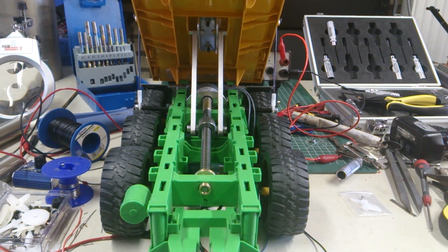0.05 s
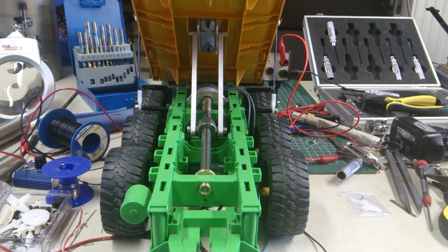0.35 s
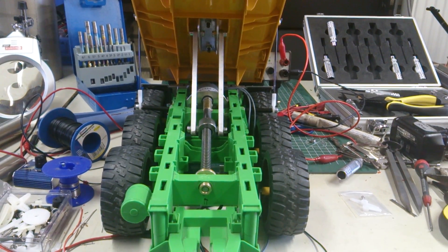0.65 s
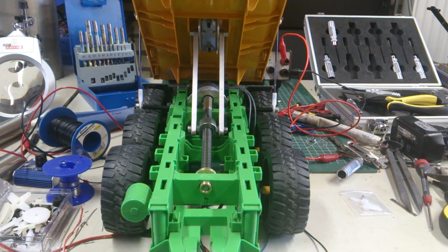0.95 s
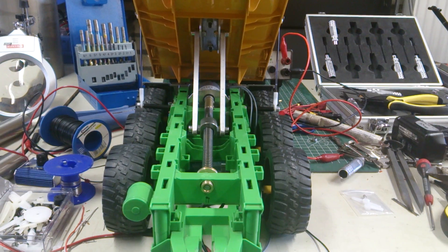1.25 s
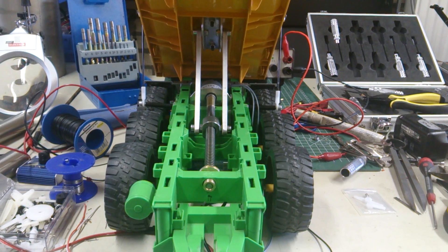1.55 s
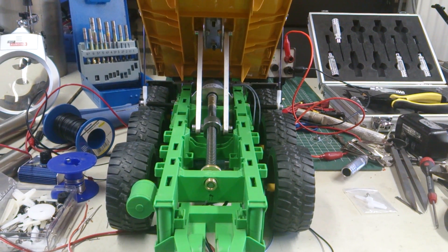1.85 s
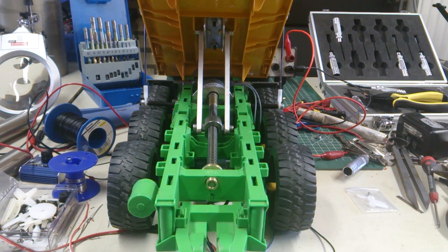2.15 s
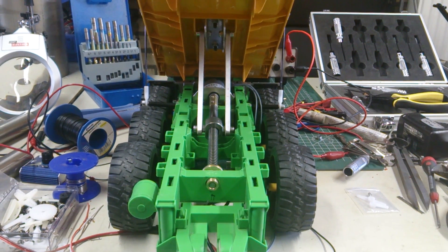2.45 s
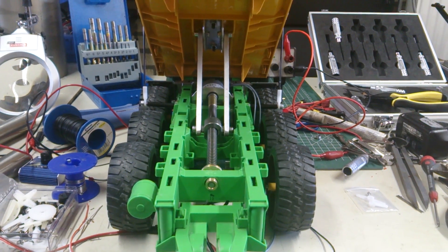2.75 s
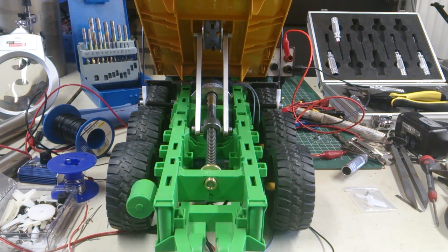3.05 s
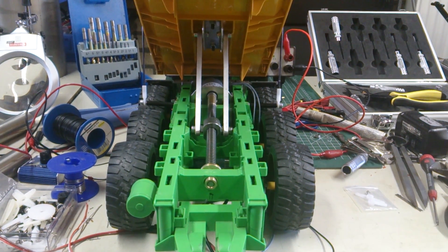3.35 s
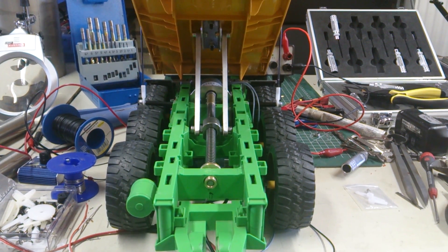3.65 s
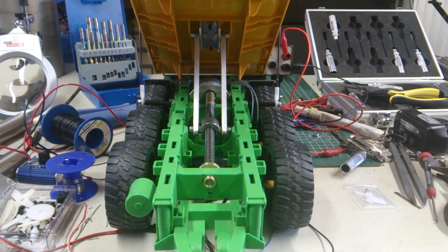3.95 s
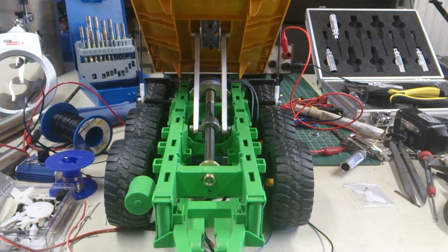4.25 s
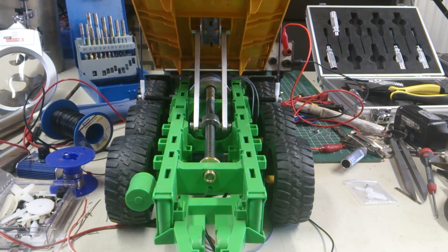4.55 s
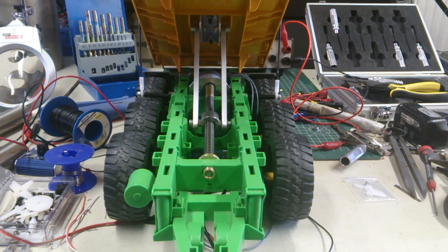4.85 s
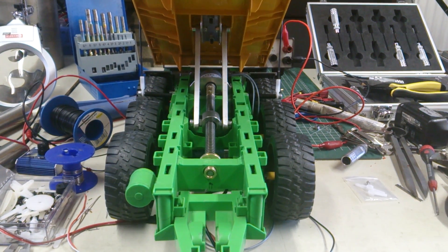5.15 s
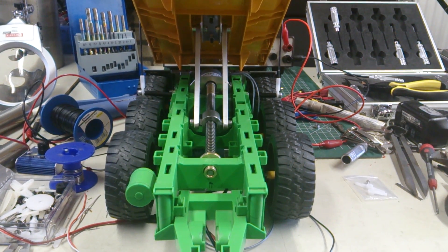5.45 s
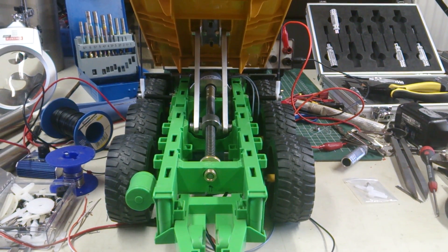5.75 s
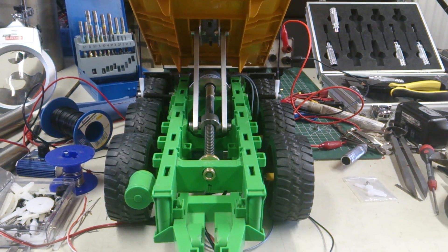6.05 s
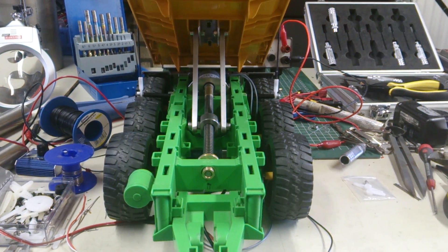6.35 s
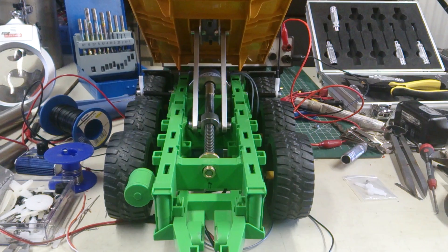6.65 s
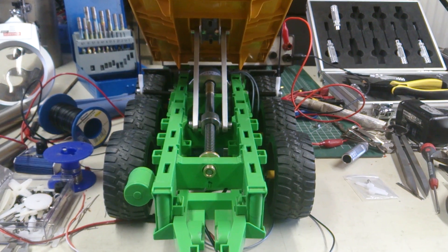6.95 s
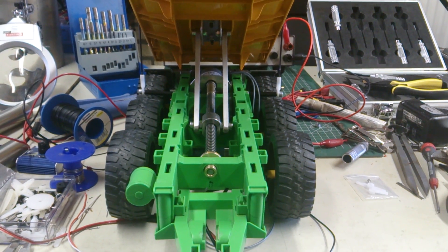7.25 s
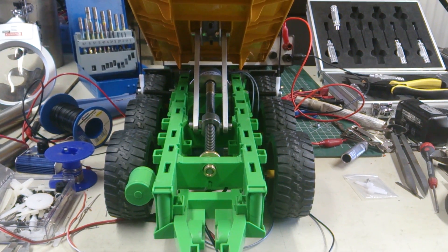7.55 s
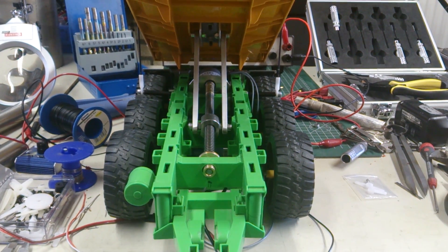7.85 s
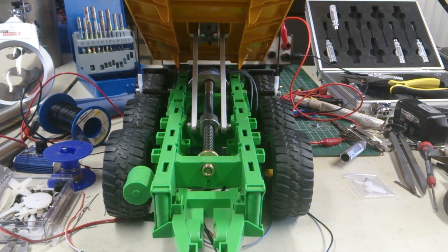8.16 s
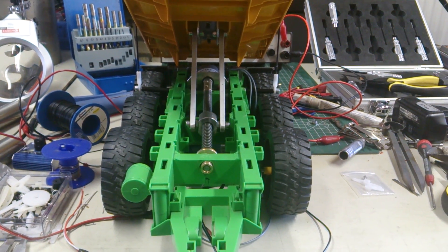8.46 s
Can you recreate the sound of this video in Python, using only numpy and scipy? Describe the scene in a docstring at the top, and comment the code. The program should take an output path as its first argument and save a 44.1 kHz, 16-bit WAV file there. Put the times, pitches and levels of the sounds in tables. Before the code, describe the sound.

A small electric motor whines steadily, with a dry rasp on each turn of the screw lowering a toy truck's tipper.

```python
"""First comes the whine of a small electric motor, geared down to a screw that lowers a toy tipper body.
Its rotor and small gear sing over the hiss of sliding brushes and teeth. The screw binds once a turn:
the motor sags and recovers, and the thread rasps in the plastic chassis. A draught puffs softly on the
close stereo microphone in the quiet room, and midway the toy settles on the workbench with dull bumps."""
import sys
import numpy as np
from scipy import signal
from scipy.fft import rfft, irfft, next_fast_len
from scipy.io import wavfile
from scipy.ndimage import uniform_filter1d

SR = 44100
rng = np.random.default_rng(int(sys.argv[2]) if len(sys.argv) > 2 else 0)


def inscribe(sig):
    """Save sig as 16-bit PCM at rate SR to the path in sys.argv[1].

    A 1-D sig is mono; a 2-D sig holds one channel per row.
    Samples are clipped to [-1, 1] before scaling.
    """
    pcm = np.round(np.clip(np.atleast_2d(sig).T, -1, 1) * 32767)
    wavfile.write(sys.argv[1], SR, pcm.astype(np.int16))


N = 380141
FFT_SIZE = next_fast_len(N, real=True)
TIME, HZ = np.arange(N) / SR, np.fft.rfftfreq(FFT_SIZE, 1 / SR)


def amp(db):
    """Turn decibels into a gain."""
    return 10 ** (np.asarray(db) / 20)


def unit_rms(x):
    """Scale a signal to an average strength (rms) of 1."""
    return x / np.sqrt(np.mean(abs(x) ** 2) + 1e-20)


def over_time(rows):
    """Join a table's points in time: one curve for each column after the first."""
    times, *columns = np.transpose(rows)
    return np.array([np.interp(TIME, times, c) for c in columns])


def over_pitch(rows, hz):
    """Look up a table's columns at the given frequencies."""
    freqs, *columns = np.transpose(rows)
    return np.array([np.interp(np.log(hz + 1), np.log(freqs + 1), c) for c in columns])


def drift(rate_hz, order=2):
    """A random wobble of strength 1, mostly slower than the given rate."""
    times = np.linspace(0, TIME[-1], 8192)
    hz = np.fft.rfftfreq(len(times), times[1])
    slow = irfft(rfft(rng.standard_normal(len(times))) / np.sqrt(1 + (hz / rate_hz) ** (2 * order)))
    return np.interp(TIME, times, unit_rms(slow))


def waver(depth_db, rate_hz):
    """A slow random change of level in dB, different left and right."""
    return depth_db * np.array([drift(rate_hz), drift(rate_hz)])


def tone(cycles, level_db, lead, flutter, flutter_hz):
    """A tone that flutters, as a shaft does in loose bearings; left is ahead by `lead` radians."""
    wobble = 1 + flutter * (drift(flutter_hz) + 1j * drift(flutter_hz))
    wave = unit_rms(np.exp(2j * np.pi * cycles) * wobble)
    return np.sqrt(2) * amp(level_db) * np.array([wave, wave * np.exp(-1j * lead)]).real


# How alike the two sides of the microphone sound: f/Hz, likeness/0-1
LIKENESS = [(30, 0.38), (120, 0.098), (400, 0.99), (800, 0.94), (1800, 0.51), (2600, 0.37), (5000, 0.35),
            (6400, 0.12), (7500, 0.21), (15000, .15)]
# How far the left side is ahead of the right: f/Hz, lead/rad
LEFT_LEAD = [(30, 0), (500, .6), (800, 1.2), (1000, 1.8), (1800, 2.7), (2400, 3.7), (3800, 4.2),
             (4200, 7.2), (5000, 7.8), (5400, 10.3), (6400, 14)]
def noise(gain, pressure=1):
    """Stereo noise that follows a rubbing pressure, coloured by a gain at each frequency."""
    left, other = rfft(rng.standard_normal((2, N)) * pressure, FFT_SIZE)
    same = np.clip(over_pitch(LIKENESS, HZ)[0], 0, 1)
    right = (same * left + np.sqrt(1 - same ** 2) * other) * np.exp(-1j * over_pitch(LEFT_LEAD, HZ)[0])
    return irfft(np.array([left, right]) * gain, FFT_SIZE)[:, :N] * np.sqrt(SR / 2)


def bench_echoes(hz, depth_db, grain_hz=110):
    """Echoes off the cluttered bench boost some pitches and weaken others, differently on each side."""
    grid = np.linspace(0, SR / 2, 4096)
    smoothing = np.exp(-(np.fft.rfftfreq(len(grid), grid[1]) * grain_hz) ** 2)
    ripples = irfft(rfft(rng.standard_normal((2, len(grid)))) * smoothing)
    return np.array([np.interp(hz, grid, unit_rms(amp(depth_db * unit_rms(side)))) for side in ripples])


def resonance(hz, width, left_db, right_db):
    """The left and right gain of a part that rings around one pitch."""
    return amp([[left_db], [right_db]]) / (1 + ((HZ - hz) / (0.79 * width)) ** 2)


# Each time the screw binds: t/s, friction rise/dB, slowed motor/(turns/s), recovered motor/(turns/s)
BINDS = [(0.021, 7.5, 128.05, 130.51), (0.687, 8.5, 128.22, 130.46), (1.356, 9, 128.27, 130.4),
         (2.027, 9.5, 128.28, 130.16), (2.708, 10.5, 128.3, 130.1), (3.367, 10.5, 128.17, 130.15),
         (4.026, 10, 128.08, 130.37), (4.711, 9.5, 128.17, 130.37), (5.388, 9.5, 128.39, 130.68),
         (6.044, 9.5, 128.43, 130.79), (6.722, 9.5, 128.39, 130.77), (7.38, 8.5, 128.54, 130.74),
         (8.053, 8, 128.27, 130.5), (8.72, 7, 128.3, 130.5)]
def motor_speed(slowest_s=.026, pick_up_s=.164, recovered_s=.503):
    """Motor turns a second: each bind drags the motor down, then it picks up steadily."""
    start, _, slowed, recovered = np.transpose(BINDS)
    times = np.c_[start + slowest_s, start + pick_up_s, start + recovered_s].ravel()
    speed = np.interp(TIME, times, np.c_[slowed, slowed, recovered].ravel())
    return uniform_filter1d(speed, size=4000, mode="nearest")  # the rotor's weight smooths each change


def nut_friction(free_db=-4.5, grip_s=0.12, release_s=0.21):
    """Friction of the nut on the screw, in dB: it builds up to each bind and lets go again."""
    rises = (db * np.exp(-abs((TIME - t) / np.where(TIME < t, grip_s, release_s)) ** 1.58)
             for t, db, _, _ in BINDS)
    return free_db + sum(rises)


# Hum of the rotor: t/s, left level/dB
POLE_HUM = [(0, -64), (1.5, -64.5), (3, -64.5), (4.5, -64.5), (6, -62.5), (6.9, -62.5), (7.3, -59.5),
            (8, -61), (8.62, -62)]
def pole_hum(turns):
    """The rotor's three poles hum as they pass the magnets, a little softer on the right."""
    return tone(3 * turns, over_time(POLE_HUM) + [[1], [-.7]] , 0.59, flutter=0.054, flutter_hz=8.4)


# Tone of the magnets tugging on the rotor: t/s, base level/dB
MAGNET_TUG = [(0, -47), (.6, -45), (.73, -49.5), (1.05, -44), (1.16, -49.5), (1.3, -45), (2.3, -46.5),
              (2.88, -46.5), (3.33, -44), (3.66, -49), (3.9, -47.5), (6.2, -48), (6.55, -51), (6.73, -45),
              (7.03, -52.5), (7.26, -46.5), (7.43, -51.5), (8.62, -50)]
def rotor_whine(turns, rattle_db=-9):
    """The magnets tug six times a turn; the motor rattles in its loose mount and roughens that tone."""
    level_db = over_time(MAGNET_TUG) + [[-0.45], [1.34]]  # left, right
    whine = tone(6 * turns, level_db + waver(.8, rate_hz=9), 1.1, flutter=0.27, flutter_hz=12.7)
    chatter = unit_rms(drift(55, order=1) + 1j * drift(55, order=1))
    rough = unit_rms(uniform_filter1d(chatter, size=130)) * np.exp(2j * np.pi * 6 * turns)
    rattle = np.sqrt(2) * amp(level_db + rattle_db) * np.array([rough, rough * np.exp(-1.1j)]).real
    return whine + rattle


def swells(rows, turn_s=.67, first_bind_s=.02):
    """The dB by which a gear tone swells as the screw turns; the pattern shifts as the nut travels."""
    turn, travel = (TIME - first_bind_s) / turn_s, TIME / TIME[-1]
    out = np.zeros((2, N))
    for per_turn, row in enumerate(rows, 1):
        out += [(top + (bottom - top) * travel) * np.cos(2 * np.pi * per_turn * (turn - place))
                for place, top, bottom in np.reshape(row, (2, -1))]
    return out


# The gear's tone, and the octave above it: t/s, left base level/dB, right base level/dB
GEAR_TONE = [(0, -57, -49.5), (2.6, -49.5, -52), (4.2, -52, -63.5), (5.6, -52, -54), (6.3, -52.5, -51.4),
             (7.3, -58, -46), (8.62, -57, -42.5)]
GEAR_OCTAVE = [(0, -50, -47), (4, -48.5, -49), (8.62, -52.5, -50.6)]
# The tone's paths to the microphone change as the body sinks: t/s, left lead/rad
GEAR_LEAD = [(0, 1.46), (2.8, 2.28), (4.5, 4.07), (5.9, 4.4), (8.62, 3.27)]
# Swells that come once, twice and three times a screw turn, one row each; a negative depth is a dip:
# place in the turn/0-1, depth at top of travel/dB, depth at bottom/dB (for left, then for right)
GEAR_SWELLS = [(0.73, 3.5, 7.5, 0.69, 5, 4), (0.13, -5.5, 4, 0.17, 1.1, -2.4),
               (0.18, 3, -2, 0.057, 0.63, -2)]
OCTAVE_SWELLS = [(0.88, -0.5, 2.5, 0.28, 3, 4.5), (0.12, -2, 3.5, 0.13, 0.2, 0.5),
                 (0.056, 0, 2.9, 0.18, -0.5, -0.2)]
def gear_whine(speed, turns):
    """The small gear's ten teeth mesh; echoes shift the left-right timing as the pitch moves."""
    extra_speed = speed - speed.mean()
    mesh_lead = over_time(GEAR_LEAD)[0] + extra_speed
    octave_lead = .1 - (1 + .1 * TIME) * extra_speed
    mesh_db = over_time(GEAR_TONE) + swells(GEAR_SWELLS) + waver(1.2, rate_hz=9.4) + 0.75
    octave_db = over_time(GEAR_OCTAVE) + swells(OCTAVE_SWELLS) + waver(1.3, rate_hz=4.9) - 0.4
    mesh = tone(10 * turns, mesh_db, mesh_lead, flutter=0.19, flutter_hz=28.7)
    octave = tone(20 * turns, octave_db, octave_lead, flutter=0.2, flutter_hz=20.4)
    return mesh + octave


# Weaker tones; whole multiples come from the motor, the others from the gears:
# multiple of the motor speed, left base level/dB, right base level/dB, growth/(dB/s)
OVERTONES = [(1, -80, -79, 0.6), (2, -84, -83, 1.2), (4.17, -70, -67, 0.1), (5, -80, -70, 0.4),
             (7, -63, -65, 0.4), (8, -60, -65, -0.8), (8.75, -65, -67, 0.1), (9, -59, -59, -0.0),
             (11, -65, -66, 0.9), (11.38, -64, -67, -0.6), (12, -60, -64, -0.7), (12.5, -63, -62, -0.4),
             (12.63, -60, -64, -0.3), (14, -62, -63, 0.9), (16, -61, -63, 0.3), (17, -60, -62, 0.4),
             (19, -59, -63, -0.1), (19.17, -64, -70, -0.4), (21, -59, -69, -0.4), (22, -63, -60, -0.2),
             (23, -55.5, -58.5, -0.3), (25, -58, -63, -0.9), (26, -65, -69, -0.4), (27, -56, -63, -0.7),
             (28, -66, -65, -1.5), (30, -59, -62, 0.4), (33, -58, -64, -0.7), (40, -58, -64, 0.6),
             (42, -63, -74, 0.2), (45, -59, -67, -0.9), (49.58, -64, -66, -0.8), (50, -60, -63, -0.5),
             (54, -65, -70, -1.7), (59, -63, -67, 0.1), (60, -60, -67, 0.4), (63, -59, -74, 0.5),
             (69, -60, -80, 1.2), (72, -57, -76, -0.9), (74, -62, -82, 1.6), (78, -64, -78, -0.4),
             (92, -65, -84, -1.5), (93, -66, -84, -1.5), (99, -67, -85, -0.9)]
def overtones(speed, turns, friction_db, trim_db=-0.7):
    """Many weak motor and gear tones waver as their pitches slide across the bench's echoes."""
    out = np.zeros((2, N))
    for multiple, left_db, right_db, growth in OVERTONES:
        hz = multiple * speed.mean()
        angle = 2 * np.pi * (multiple * turns + rng.random()) + .35 * drift(10)
        # the binding thread carries the tones near 6 kHz into the chassis
        load_db = 1.2 * friction_db * np.exp(-((hz - 6150) / 650) ** 4)
        echoes = bench_echoes(multiple * speed, depth_db=4.2, grain_hz=75)
        left, right = echoes * amp(2.5 * drift(8) + growth * TIME + load_db)
        out[0] += amp(left_db) * unit_rms(left) * np.cos(angle)
        out[1] += amp(right_db) * unit_rms(right) * np.cos(angle - over_pitch(LEFT_LEAD, hz)[0])
    return np.sqrt(2) * amp(trim_db) * out


# Pulses in the rubbing: multiple of the motor speed, relative depth/0-1
PULSES = [(5 / 12, .11), (1, .07), (3, .08), (4, .07), (5, .08), (6, .13), (9, .09), (10, .08)]
def contact_pressure(turns, depth=0.94, grit_db=1, grit_hz=250):
    """The rubbing pressure pulses with the brushes and teeth, and grit roughens it."""
    pulses = sum(share * np.cos(2 * np.pi * (k * turns + rng.random())) for k, share in PULSES)
    return unit_rms((1 + depth * pulses) * amp(grit_db * drift(grit_hz)))


def patchy(sound, depth_db):
    """The colour of a sliding contact shifts from moment to moment."""
    spectra = signal.stft(sound, nperseg=512)[2]
    patches = uniform_filter1d(rng.standard_normal(spectra.shape[1:]), size=7, axis=1)  # blur in time
    patches = uniform_filter1d(patches, size=5, axis=0)  # blur in pitch
    return signal.istft(spectra * unit_rms(amp(depth_db * unit_rms(patches))), nperseg=512)[1][:, :N]


# Colour of the sliding brushes and teeth: f/Hz, left base level/(dB per Hz), right base level/(dB per Hz)
SLIDING = [(220, -100, -102), (314, -94, -87), (485, -86.5, -95.5), (790, -87, -89), (880, -82.5, -83.5),
           (1360, -74, -78.5), (1810, -79.5, -82), (2900, -76.5, -77.5), (3500, -82, -81.5),
           (4800, -77.5, -80.5), (6200, -84.5, -85.5), (9500, -81.5, -91), (10840, -87, -104),
           (15500, -93, -105)]
def hiss(pressure, friction_db, load_share=0.02, trim_db=-1.2):
    """Brushes and gear teeth slide, a little louder under load; the small gearbox gives off no bass."""
    colour = amp(over_pitch(SLIDING, HZ) + trim_db) / np.sqrt(1 + (190 / (HZ + 1)) ** 8)
    slide = noise(colour * bench_echoes(HZ, depth_db=2.5), pressure)
    return patchy(slide, depth_db=2.33) * amp(load_share * friction_db)


# Where the gearbox rings: f/Hz, width/Hz, left and right base level/(dB per Hz), growth/(dB/s)
GEARBOX_RINGS = [(305, 21, -84.5, -83, 0.4), (555, 38, -83, -76.5, 0.5), (729, 24, -75.5, -77.5, -1),
                 (1141, 43, -72, -70, 0.5), (1520, 150, -80.5, -80.5, -1.2), (2092, 190, -75.5, -75.5, 0.5),
                 (2770, 380, -80, -86, .7), (3283, 76, -77, -88, -2.5), (5044, 235, -72.5, -108, -0.04),
                 (5280, 240, -78.5, -111, 1), (7400, 230, -85, -100, 2), (9410, 250, -79.5, -110, .5)]
def gear_scrapes(pressure, trim_db=-2):
    """Scraping teeth ring the gearbox in uneven fits; each ring grows or fades as the nut travels."""
    out = np.zeros((2, N))
    for *ring, growth in GEARBOX_RINGS:
        fits = unit_rms(amp(2.8 * drift(12)))
        out += noise(resonance(*ring), pressure) * fits * amp(growth * (TIME - TIME.mean()) + trim_db)
    return out


# Where the plastic chassis rings: f/Hz, width/Hz, left and right base level/(dB per Hz)
CHASSIS_RINGS = [(1657, 62, -76.5, -79), (2970, 31, -81, -100), (3446, 190, -76, -84),
                 (4330, 220, -81, -87), (5470, 79, -78, -103), (5960, 170, -76, -80),
                 (6360, 226, -76, -79.5), (7360, 450, -88, -84), (8130, 120, -97, -91),
                 (8690, 580, -78, -104), (12500, 500, -96, -107)]
def thread_rasp(pressure, friction_db, trim_db=-1):
    """The dry thread rubs once a turn and rings the chassis; it falls quiet as the nut comes free."""
    colour = np.sqrt(sum(resonance(*ring) ** 2 for ring in CHASSIS_RINGS))
    rub_db = 1.2 * friction_db + .8 * np.minimum(friction_db, 0)
    return noise(colour * bench_echoes(HZ, depth_db=5.0), pressure) * amp(rub_db + trim_db)


# Rumble of the room: f/Hz, left base level/(dB per Hz), right base level/(dB per Hz)
ROOM_RUMBLE = [(10.1, -87, -67), (30, -86, -74), (54, -82.5, -84), (69.6, -93, -91.5), (148, -99, -94),
               (298, -101, -100), (1000, -115, -115)]
# Steady hum in the room: f/Hz, level/dB
ROOM_HUM = [(199.2, -81), (323, -77.5)]
def room(draught_hz=38):
    """A faint hum and a low rumble, whose deepest part swells with the draught."""
    colour = amp(over_pitch(ROOM_RUMBLE, HZ))
    deep = 1 / (1 + (HZ / draught_hz) ** 6)
    rumble = noise(colour * np.sqrt(1 - deep)) + noise(colour * np.sqrt(deep)) * draught()
    return rumble + sum(tone(hz * TIME, db, 0.94, flutter=0.19, flutter_hz=2.6) for hz, db in ROOM_HUM)


# Puffs of air on the microphone: t/s, gain on the deepest rumble/dB, fade/(dB/s)
PUFFS = [(.15, 0, 10), (1.15, 22, 29), (3.75, 4.5, 22)]
def draught(rise_s=0.035, still_air_db=-3):
    """Gain of the deepest rumble: each puff arrives quickly and dies away into still air."""
    puffs = (amp(db - fade * np.maximum(TIME - t, 0)) * np.exp(np.minimum(TIME - t, 0) / rise_s)
             for t, db, fade in PUFFS)
    return np.sqrt(amp(still_air_db) ** 2 + sum(puff ** 2 for puff in puffs))


# Soft bumps of the chassis on the bench: t/s, length/s, f/Hz, level/dB
BENCH_BUMPS = [(3.846, 0.11, 165, -71), (4.56, 0.13, 185, -65), (5.296, 0.22, 105, -69)]
def bumps():
    """The chassis settles on its tyres with a few dull pushes."""
    out = np.zeros((2, N))
    for t, length, hz, db in BENCH_BUMPS:
        push = np.exp(-(2 * (TIME - t) / length) ** 2)
        out += push * tone(hz * TIME, db, 0.33, flutter=2.8, flutter_hz=30.2)
    return out


def scene():
    """One turning shaft drives the whine and the rubbing; the room and the bumps join them."""
    speed, friction_db = motor_speed(), nut_friction()
    turns = np.cumsum(speed + 0.048 * drift(9.8)) / SR
    tones = pole_hum(turns) + rotor_whine(turns) + gear_whine(speed, turns)
    tones += overtones(speed, turns, friction_db)
    rubbing = hiss(contact_pressure(turns), friction_db) + gear_scrapes(contact_pressure(turns))
    rubbing += thread_rasp(contact_pressure(turns), friction_db)
    return tones + rubbing + room() + bumps()


def record(dry, cutoff_hz=15740):
    """The recorder cuts off the highest treble."""
    lowpass = signal.firwin(1023, cutoff_hz, window=("kaiser", 9), fs=SR)
    return signal.oaconvolve(dry, lowpass[None], "same")


dry = scene()
out = record(dry)
inscribe(out)
```